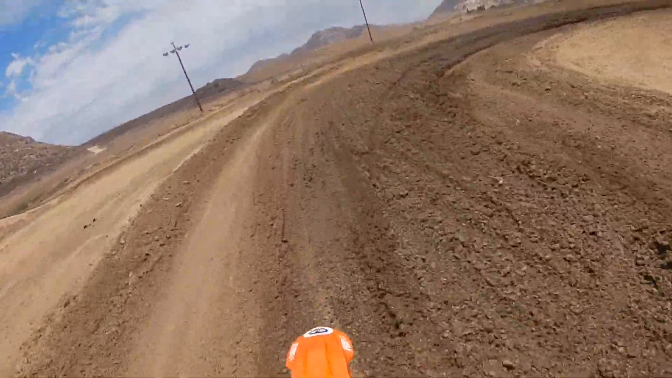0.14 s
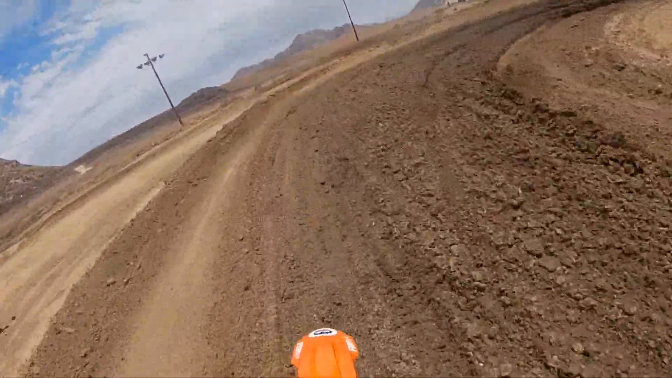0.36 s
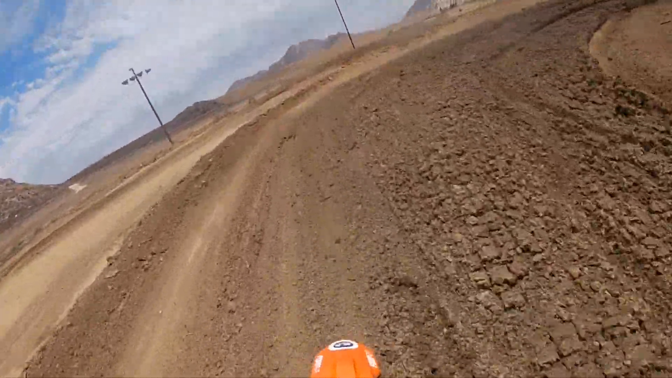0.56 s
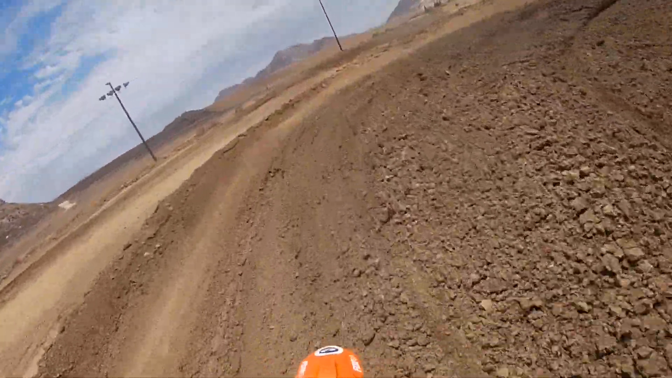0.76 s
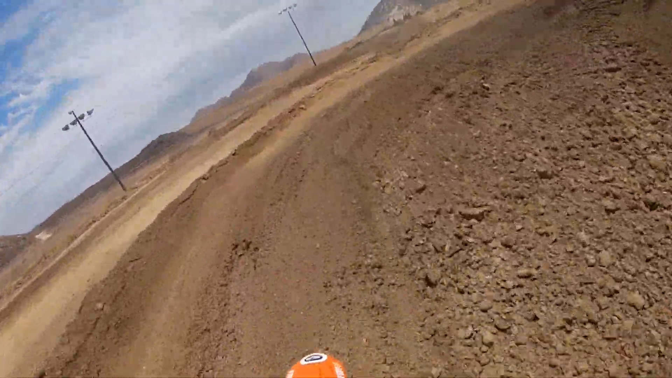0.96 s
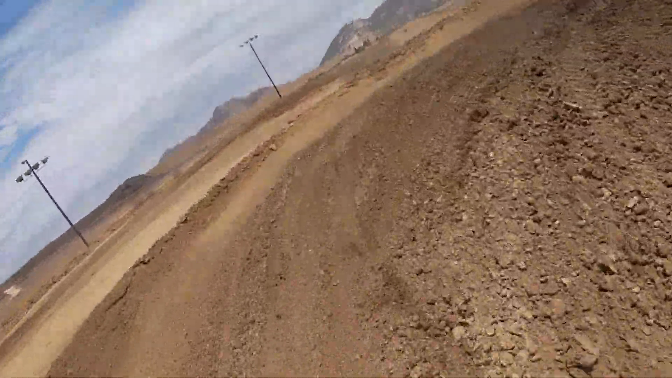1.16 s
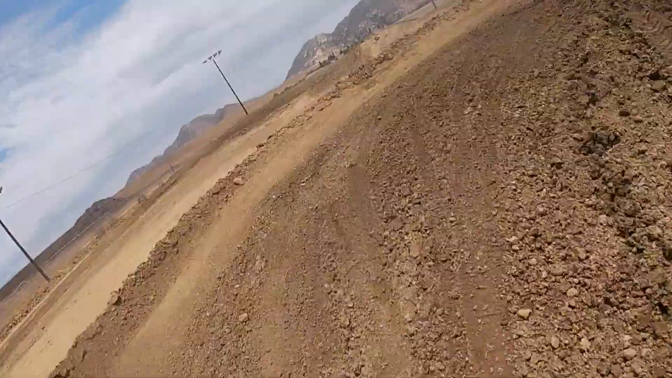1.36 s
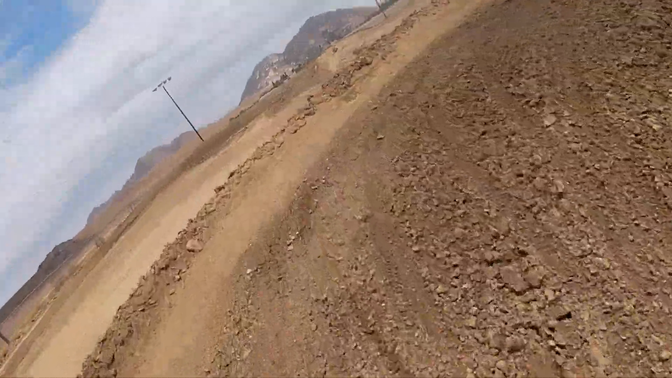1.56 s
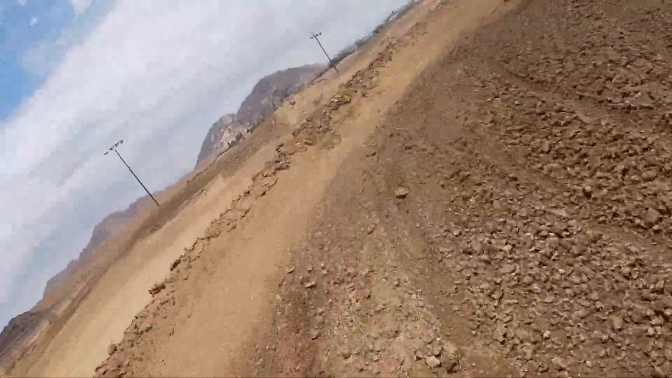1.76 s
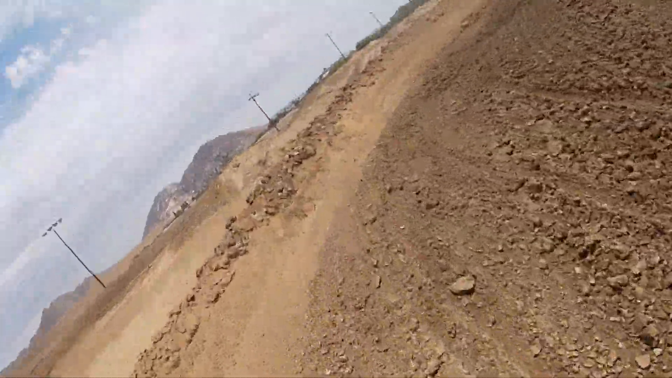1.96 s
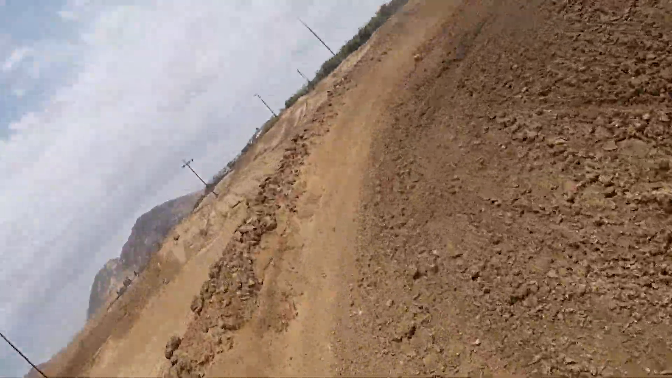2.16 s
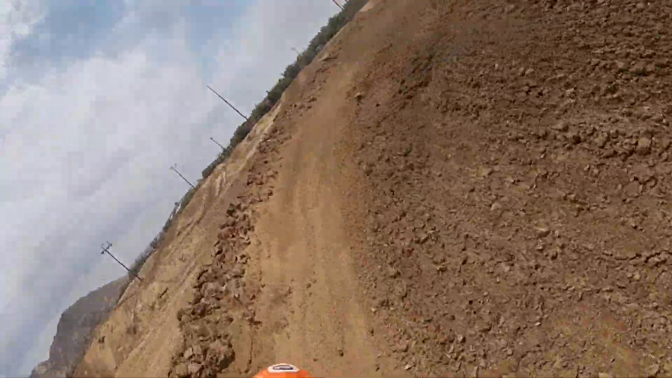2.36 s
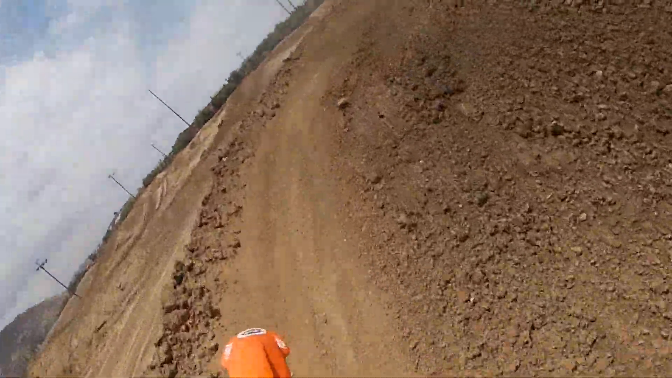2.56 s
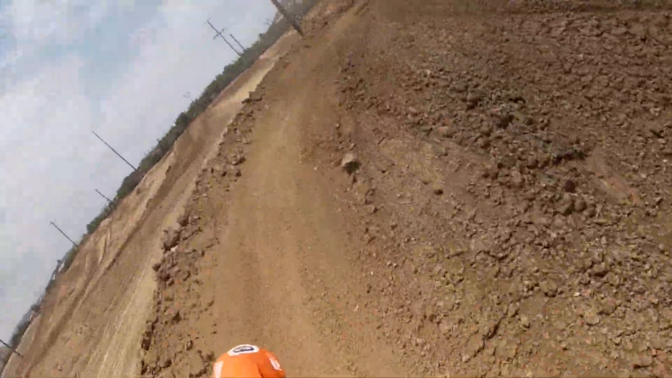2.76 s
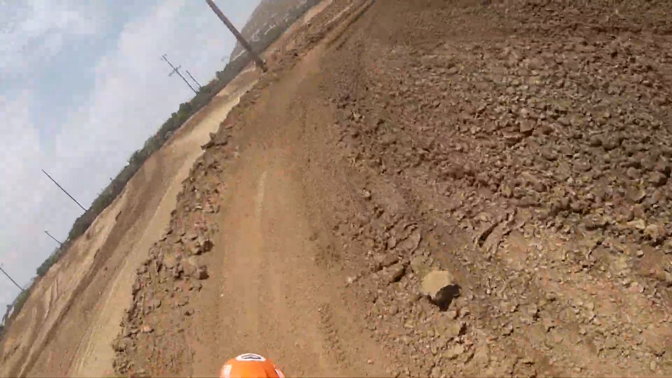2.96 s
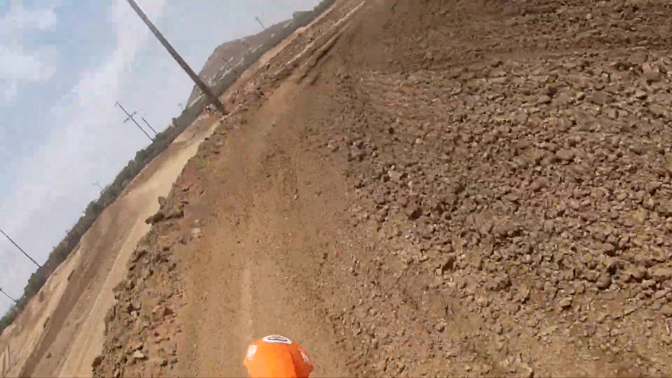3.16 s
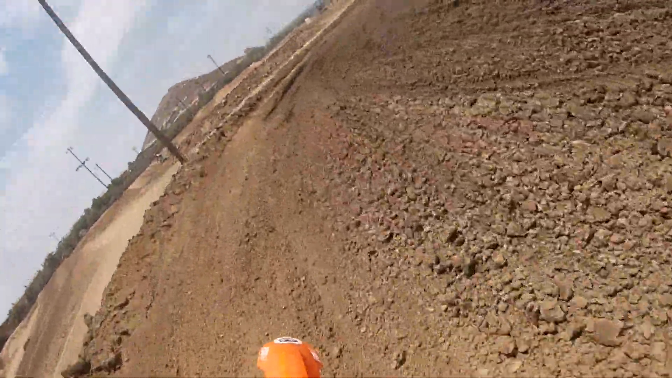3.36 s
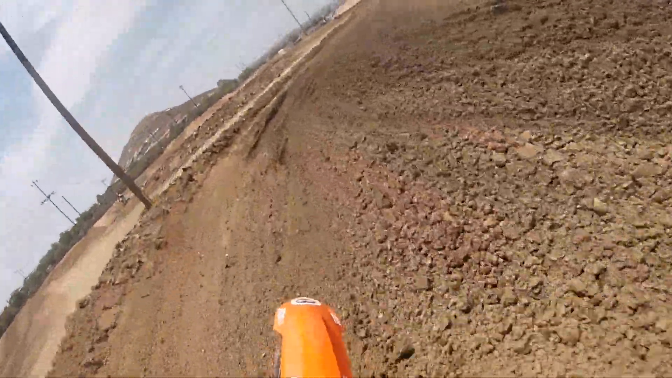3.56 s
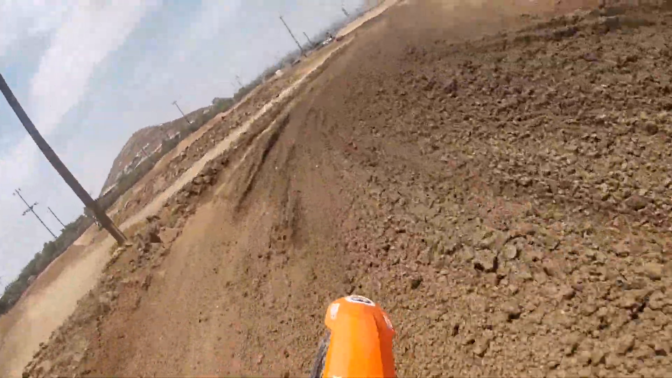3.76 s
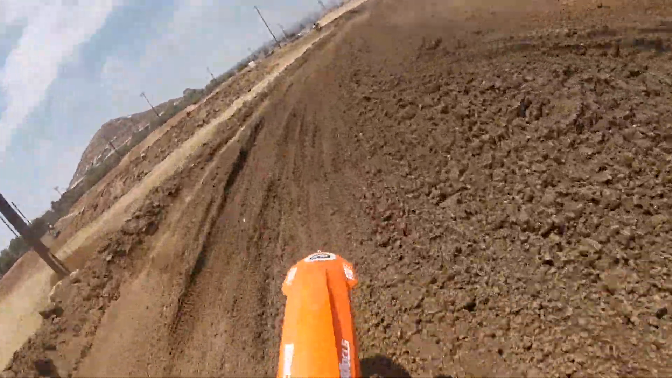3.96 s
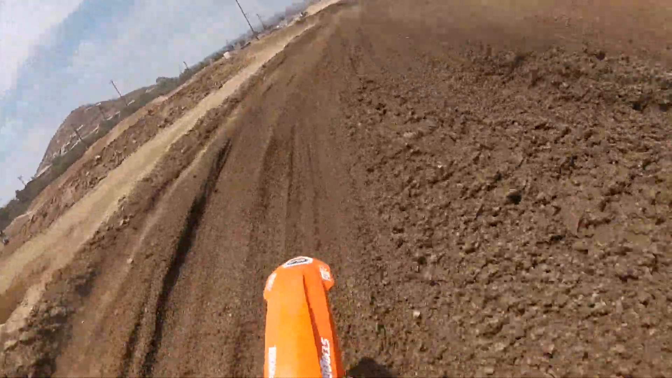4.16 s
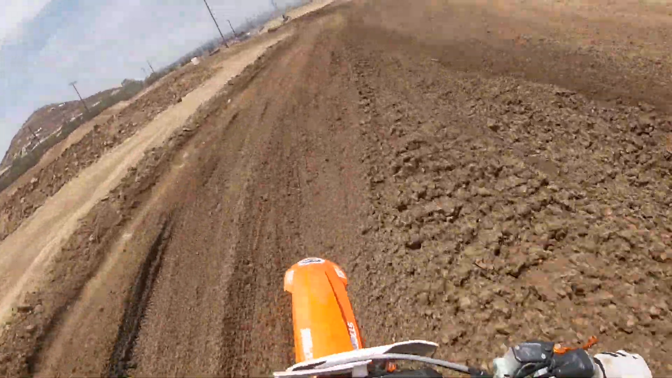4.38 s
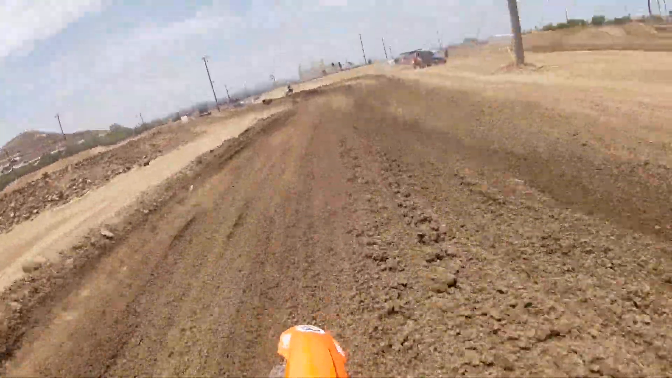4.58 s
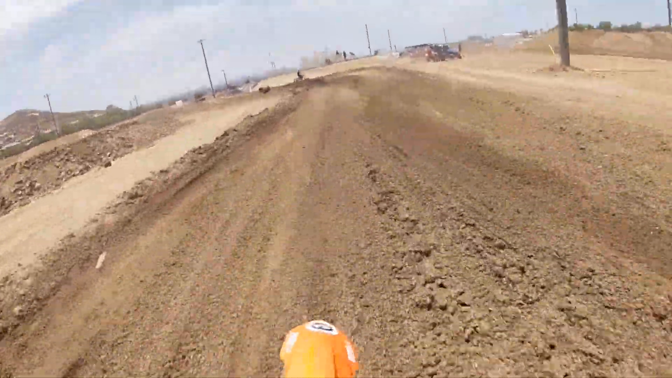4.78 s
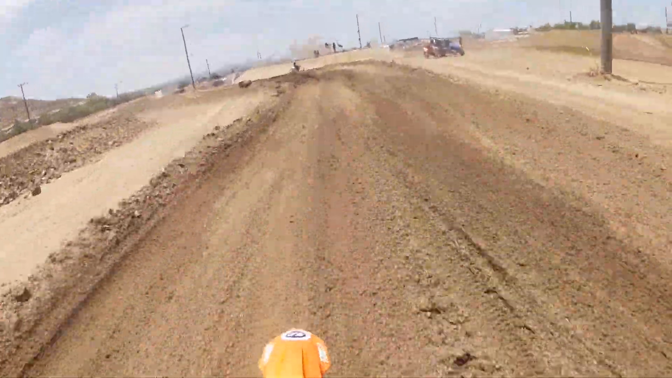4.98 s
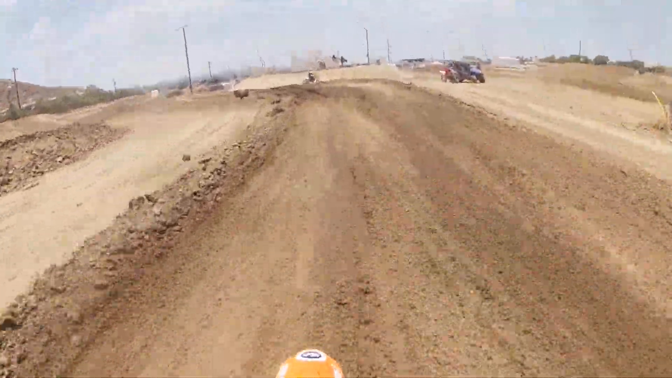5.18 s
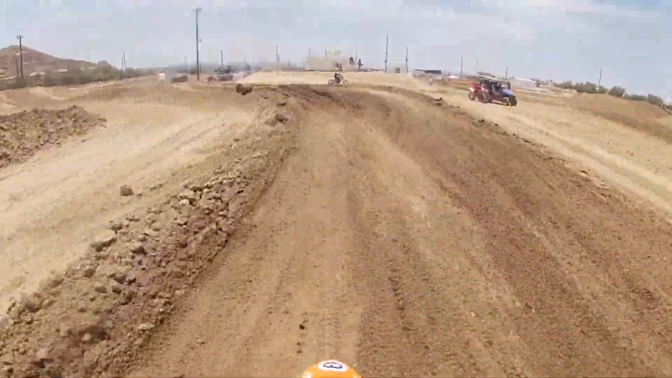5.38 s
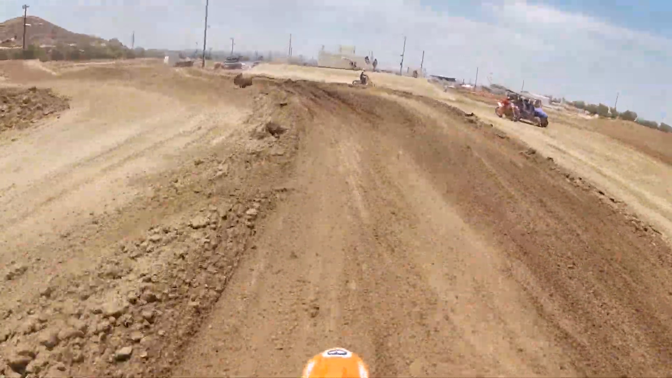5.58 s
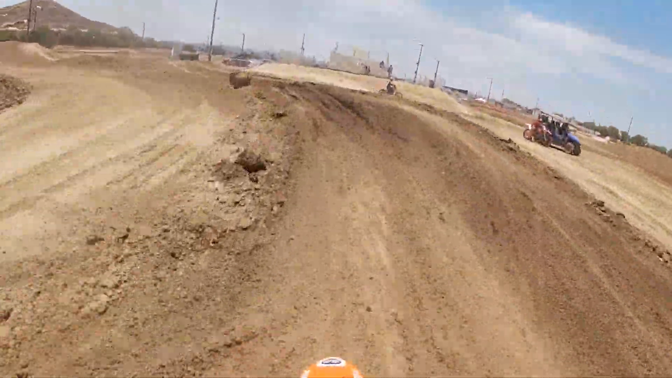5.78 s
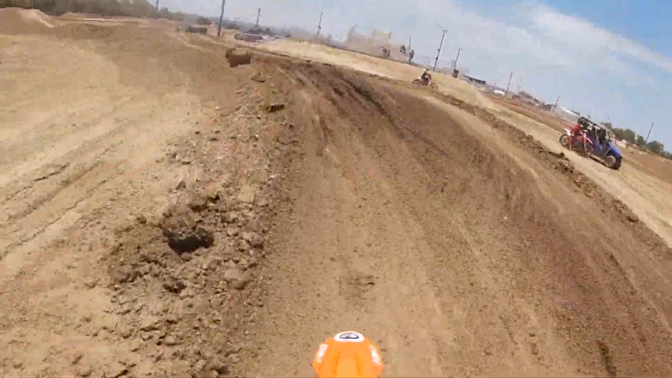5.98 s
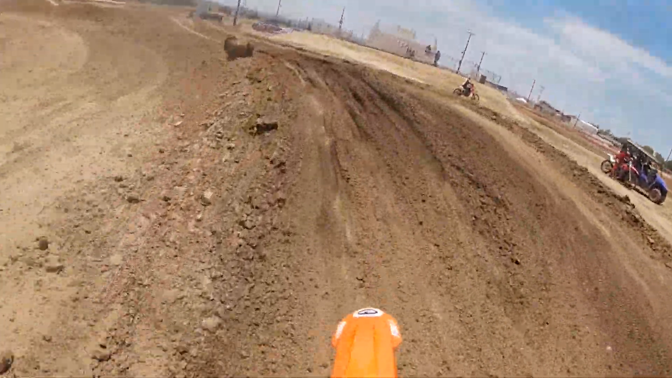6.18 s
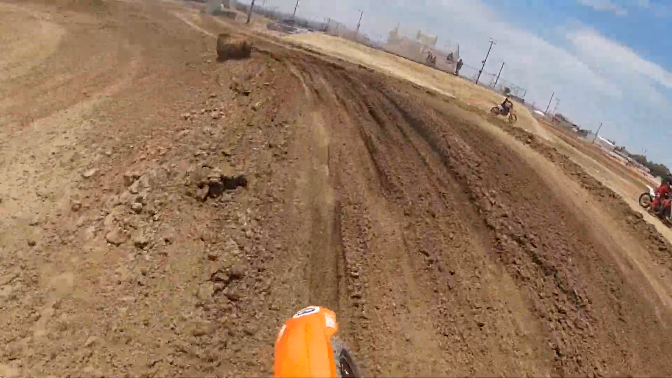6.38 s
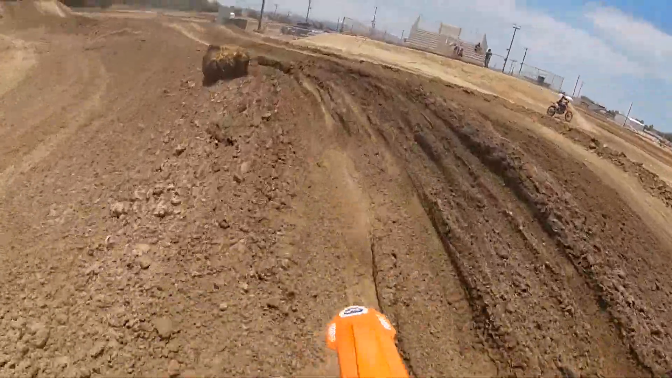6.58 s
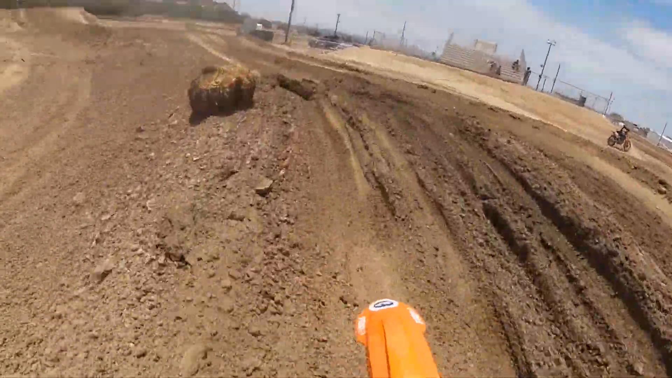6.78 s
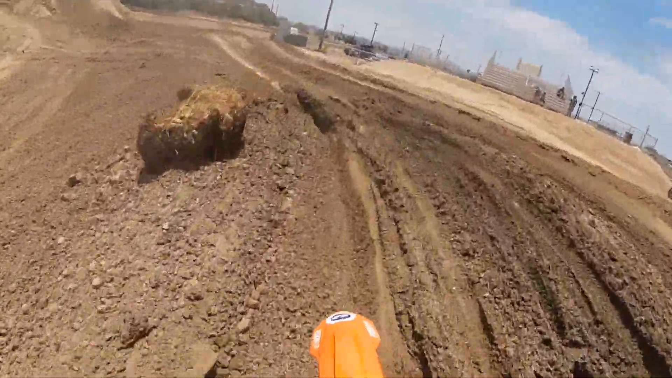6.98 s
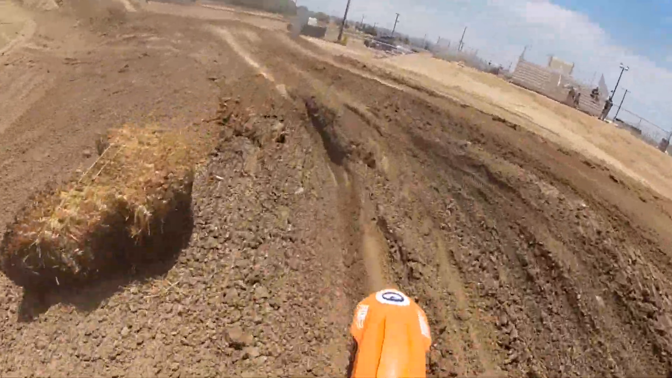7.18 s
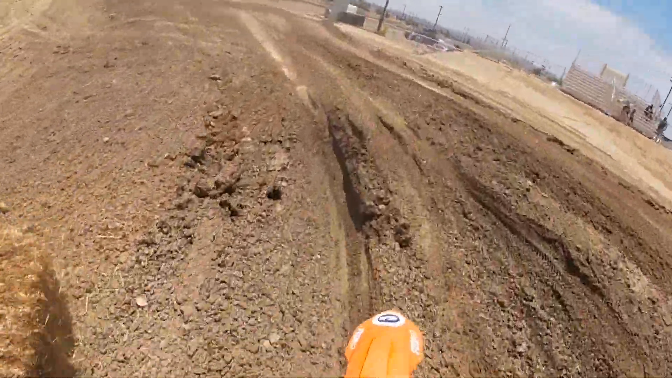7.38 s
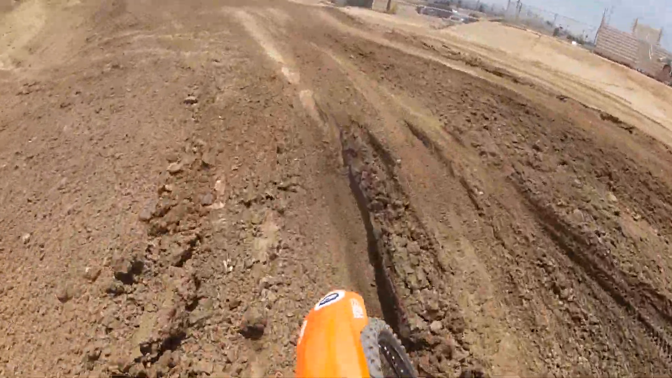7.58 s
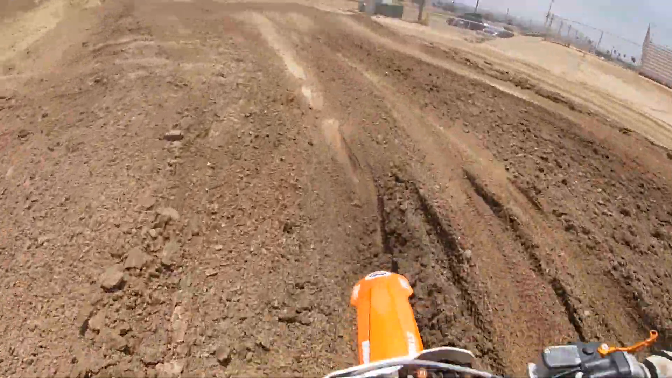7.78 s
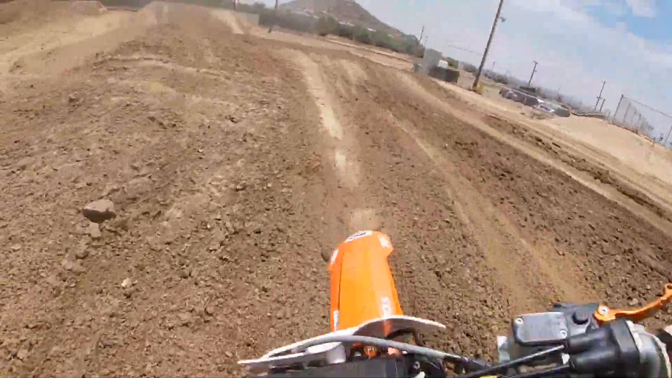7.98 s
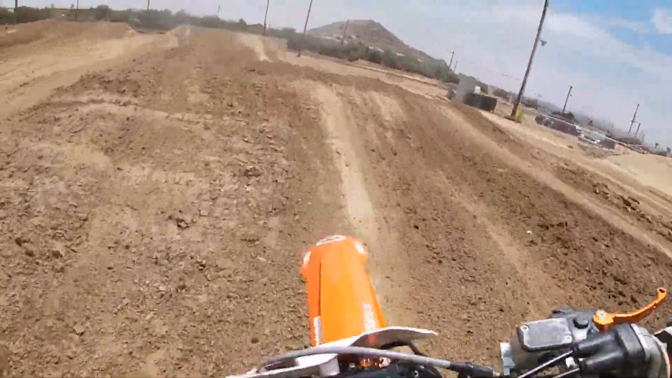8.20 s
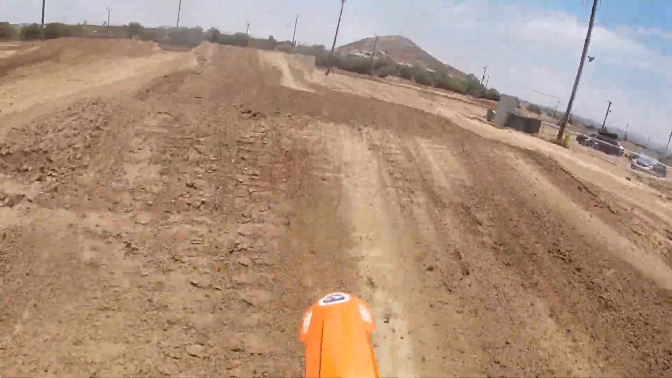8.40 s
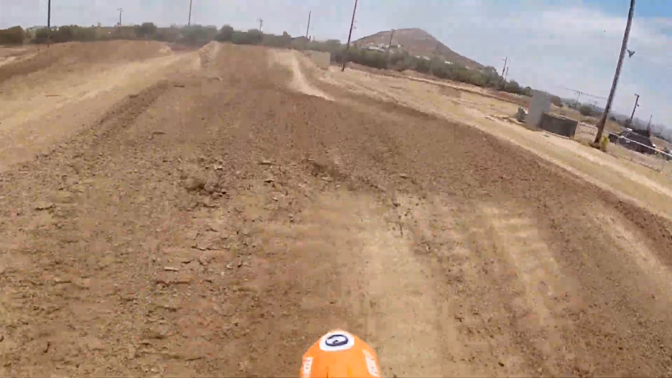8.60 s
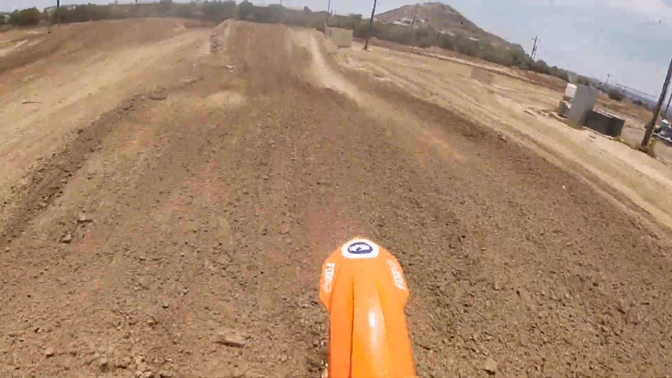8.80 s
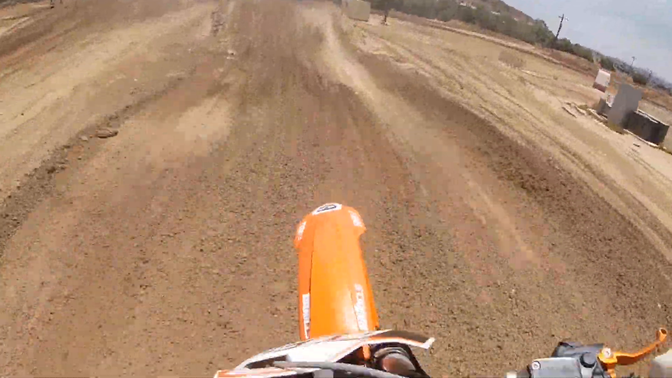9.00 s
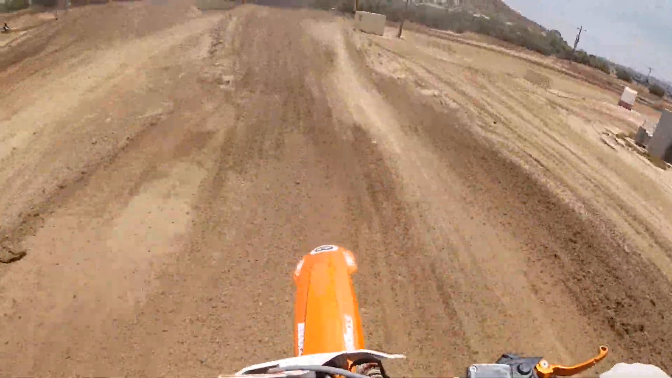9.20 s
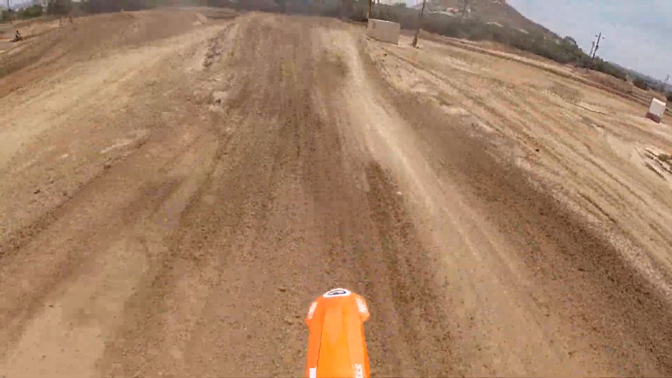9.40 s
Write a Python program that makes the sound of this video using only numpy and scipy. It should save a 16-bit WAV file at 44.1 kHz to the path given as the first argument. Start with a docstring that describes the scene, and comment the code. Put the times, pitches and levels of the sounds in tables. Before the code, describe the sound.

A muffled single-cylinder four-stroke dirt bike is heard close up from the seat, with light engine hiss and low wind buffeting throughout. For the first two seconds it putters unevenly, sinking to its lowest revs around 1 second, with light metallic chain clacks, one dull thud and a faint whine sliding down. At about 2 seconds the throttle opens and the engine grows louder, honking and raspy, climbing in wavering steps to a high note held from 4.4 to 4.9 seconds. It eases off, then drops at 5.6 seconds to a rough low chug, with more faint chain clacks and a short knock near 6.2 seconds. A small swell follows around 6.6 seconds. At 7.6 seconds it revs sharply, dips briefly at 8, reaches its highest pitch near 8.6 and winds down until about 9.5 seconds.

```python
"""A muffled single-cylinder four-stroke dirt bike revving up and down, heard from the seat.
Each firing thumps down the exhaust, cracks at the tailpipe and makes the airbox honk;
on a shut throttle the burning turns uneven. Gas roars, the engine cases hiss, the chain slaps
and the frame thuds twice. A brief whine slides down, and wind buffets the microphone."""
import sys
import numpy as np
from scipy import signal
from scipy.io import wavfile
from scipy.ndimage import uniform_filter1d

SR = 44100
rng = np.random.default_rng(int(sys.argv[2]) if len(sys.argv) > 2 else 0)


def unload_wav(signal):
    """Save mono or channel-first audio to the path in sys.argv[1] as 16-bit WAV at rate SR, clipped to [-1, 1]."""
    wavfile.write(
        sys.argv[1],
        SR,
        np.round(np.clip(np.atleast_2d(signal).T, -1, 1) * 32767).astype(np.int16),
    )


N = 416744

# crank speed: time_s, firing_hz
FIRING_RATE = [(0.0, 48.2), (0.055, 48.18), (0.15, 44.37), (0.215, 44.14), (0.239, 42.81), (0.289, 42.62),
               (0.334, 44.05), (0.454, 44), (0.494, 38.56), (0.559, 37.98), (0.584, 36.63), (0.703, 36.02),
               (0.753, 34.13), (0.778, 31.41), (0.828, 30.77), (0.863, 28.39), (0.888, 24.25),
               (0.898, 23.43), (0.943, 22.98), (0.968, 22.02), (1.033, 22.55), (1.068, 24.95),
               (1.117, 25.27), (1.147, 23.69), (1.192, 24.25), (1.247, 28.76), (1.272, 28.87),
               (1.297, 30.98), (1.327, 32.2), (1.422, 32.23), (1.457, 29.52), (1.517, 30.39),
               (1.586, 29.52), (1.616, 31.34), (1.686, 31.54), (1.711, 32.56), (1.736, 34.95),
               (1.941, 35.48), (1.971, 33.67), (2.08, 34.57), (2.105, 37.79), (2.135, 40.31),
               (2.215, 39.33), (2.245, 44.57), (2.29, 47.26), (2.41, 47.69), (2.444, 43.3), (2.499, 40.53),
               (2.524, 38.08), (2.549, 38.22), (2.584, 41.59), (2.654, 41.68), (2.729, 46.22),
               (2.764, 44.48), (2.854, 43.89), (2.878, 45.65), (2.928, 45.23), (2.998, 49.82),
               (3.078, 51.5), (3.118, 51.57), (3.173, 48.6), (3.273, 50.06), (3.387, 54.29), (3.447, 58.83),
               (3.512, 57.37), (3.567, 61.56), (3.642, 61.57), (3.702, 66.26), (3.816, 67.29),
               (3.846, 65.17), (3.961, 65.27), (4.006, 62.37), (4.061, 68.96), (4.081, 68.47),
               (4.106, 63.48), (4.126, 62.47), (4.195, 69.75), (4.24, 71.27), (4.27, 65.41), (4.295, 63.63),
               (4.325, 65.9), (4.375, 74.2), (4.4, 75.37), (4.939, 73.48), (5.009, 63.04), (5.068, 58.75),
               (5.093, 59.64), (5.128, 63.74), (5.168, 58.67), (5.203, 61.95), (5.243, 61.6),
               (5.283, 63.61), (5.582, 63.34), (5.597, 60.42), (5.622, 51.9), (5.637, 49.67), (5.722, 48.7),
               (5.737, 46.35), (5.787, 36.34), (5.822, 32.97), (5.852, 34.42), (5.882, 34.19),
               (5.941, 35.68), (6.071, 34.85), (6.096, 34.8), (6.131, 37.63), (6.196, 37.57),
               (6.221, 38.99), (6.271, 38.12), (6.301, 40.75), (6.361, 40.36), (6.405, 38.15),
               (6.425, 38.76), (6.455, 40.55), (6.48, 39.92), (6.525, 39.83), (6.565, 41.11),
               (6.605, 41.09), (6.645, 44.84), (6.68, 45.73), (6.75, 44.63), (6.8, 41.27), (6.854, 40.33),
               (6.974, 40.03), (6.999, 37.7), (7.044, 36.18), (7.119, 35.92), (7.169, 38.77), (7.224, 38.5),
               (7.249, 37.72), (7.273, 35.37), (7.328, 34.67), (7.353, 31.96), (7.488, 32.4),
               (7.593, 33.92), (7.613, 37.14), (7.648, 43.95), (7.722, 43.15), (7.782, 48.26),
               (7.832, 45.94), (7.877, 53.72), (7.922, 67.17), (7.937, 68.73), (7.952, 68), (7.962, 67.93),
               (7.992, 52.94), (8.007, 50.03), (8.181, 52.04), (8.251, 60.58), (8.306, 62.94),
               (8.331, 61.4), (8.356, 55.63), (8.366, 56.3), (8.381, 58.3), (8.446, 74.64), (8.461, 77.06),
               (8.511, 75.66), (8.556, 88.04), (8.576, 90.25), (8.68, 84.7), (8.72, 77.8), (8.755, 68.8),
               (8.795, 67.04), (8.99, 65.26), (9.029, 58.1), (9.089, 60.15), (9.149, 54.8), (9.219, 52.63),
               (9.319, 46.1), (9.449, 45.95)]
# rear tyre biting over bumps: time_s, speed_change_pct
TYRE_BUMPS = [(2.345, -4), (4.519, -2), (4.672, -3.5), (4.79, -2), (8.628, -4.5)]
def crank(rough):
    """Firing rate and engine cycle count; bumps dent the speed, rough burning jitters the timing."""
    t = np.arange(N) / SR
    sag_s, recover_s, start_cycles = .0485, .075, .36
    dents = sum(pct / 100 * np.interp(t, [s - sag_s, s, s + recover_s], [0, 1, 0])
                for s, pct in TYRE_BUMPS)
    firing_hz = curves(FIRING_RATE)[0] * (1 + dents)
    cycles = start_cycles + np.cumsum(firing_hz) / SR
    return firing_hz, cycles + .002 * firing_hz * rough ** 1.5 * per_cycle(cycles)


# exhaust boom ahead of the silencer: time_s, level_db
BOOM = [(0, -18), (.25, -14.5), (.5, -15), (.7, -15), (.9, -18), (1.05, -13.5), (1.13, -16), (1.3, -14.5),
        (1.5, -15), (1.75, -11.5), (2.05, -11), (2.32, -10.5), (2.5, -12.5), (2.9, -16), (3.18, -16.5),
        (3.45, -13), (3.7, -8.5), (4.05, -11.5), (4.14, -20.5), (4.24, -17.5), (4.45, -20), (4.8, -17.5),
        (4.93, -15), (5.0, -32), (5.7, -20), (5.85, -24), (6.0, -19.5), (6.3, -13), (6.5, -11.5),
        (6.6, -13), (6.85, -10.5), (7.05, -13.5), (7.3, -13.5), (7.55, -14.5), (7.65, -13), (7.94, -8.5),
        (8.0, -9), (8.1, -9.5), (8.3, -12), (8.4, -12.5), (8.6, -18.5), (8.95, -17), (9.1, -30.5),
        (9.45, -21)]
# silencer response: freq_hz, shut_gain_db, loaded_gain_db
SILENCER_RESPONSE = [(20, -27, -24), (36, -11.5, -10), (48.7, -3.5, -5.5), (62.5, -2.5, -4),
                     (98, -3.5, 0.5), (122, -3.5, -3), (172, -5, -8.5), (212, -3.5, -14.5),
                     (300, -25, -32.5)]
def exhaust(cycles, firing_hz, rough, load):
    """The silencer passes the four lowest orders of the blow-down pulses."""
    hz, shut_db, loaded_db = np.transpose(SILENCER_RESPONSE)
    boom_db = curves(BOOM)[0]
    out = np.zeros(N)
    for k, lag_cycles in enumerate((.65, .6, .53, .52), start=1):
        log_hz = np.log(k * firing_hz)
        db = boom_db + (2 - load) * np.interp(log_hz, np.log(hz), shut_db)
        db += load * np.interp(log_hz, np.log(hz), loaded_db)
        if k == 1:
            db -= 2.5 * load
        out += gain_of(db) * engine_order(cycles, k, lag_cycles, .42 * rough)
    return np.sqrt(2) * out


# airbox resonance: time_s, level_db, pitch_hz
HONK = [(0, -24.5, 220), (.15, -22, 224), (.6, -31.5, 230), (1.2, -32.5, 278), (1.45, -27, 317),
        (1.72, -19.5, 314), (1.95, -35, 275), (2.05, -28, 276), (2.12, -18.5, 310), (2.26, -15, 309),
        (2.7, -11.5, 307), (3.06, -11.5, 320), (3.15, -18, 323), (3.29, -13, 346), (3.55, -14, 357),
        (3.72, -13.5, 336), (3.88, -14.5, 358), (4.0, -12, 320), (4.12, -11, 323), (4.23, -10.5, 300),
        (4.31, -11, 316), (4.39, -10, 275), (4.6, -10.5, 294), (4.76, -11, 290), (4.91, -13, 287),
        (4.96, -17.5, 287), (5.1, -18, 257), (5.3, -16, 285), (5.58, -14, 300), (5.62, -18, 256),
        (5.7, -19, 250), (5.73, -26.5, 245), (5.87, -32, 248), (6.15, -35, 270), (6.5, -28.5, 252),
        (6.54, -21.5, 270), (6.62, -17.5, 290), (6.71, -23, 315), (6.76, -29, 270), (6.9, -32, 261),
        (7.6, -26.5, 295), (7.616, -22, 300), (7.645, -9, 340), (7.75, -10, 320), (7.88, -10.5, 271),
        (8.0, -14, 323), (8.2, -10.5, 320), (8.32, -11.5, 326), (8.41, -8.5, 300), (8.47, -10.5, 315),
        (8.6, -13, 317), (8.69, -13, 301), (8.74, -16.5, 300), (8.8, -19, 282), (8.9, -18, 306),
        (9.15, -19.5, 242), (9.4, -28, 230), (9.45, -25.5, 252)]
# airbox ring, orders above split_hz cresting earlier: time_s, cutoff_hz, split_hz
HONK_SHAPE = [(0, 402, 336), (2.05, 402, 312), (2.3, 373, 322), (2.55, 397, 283), (2.9, 383, 272),
              (3.1, 357, 300), (3.4, 376, 300), (3.6, 407, 300), (3.8, 426, 334), (4.05, 430, 323),
              (4.28, 420, 300), (4.4, 335, 265), (4.65, 355, 256), (4.95, 357, 261), (5.2, 357, 266),
              (5.6, 324, 280), (5.8, 406, 287), (7.55, 417, 297), (7.65, 376, 285), (7.85, 415, 300),
              (8.0, 350, 360), (8.2, 342, 370), (8.3, 390, 346), (8.45, 350, 300), (8.8, 383, 300),
              (9.45, 400, 300)]
# engine sound above the honk, relative levels: time_s, growl_db, rasp_db, hiss_db
UPPER_LEVELS = [(0, -41, -36.5, -41), (.1, -31, -35.5, -40), (.3, -47, -36, -41.5), (.55, -41, -36, -38.5),
                (.9, -39, -39, -42.5), (1.15, -36, -41, -43.5), (1.4, -43, -36, -39.5),
                (1.6, -44, -37, -40.5), (1.86, -22, -38, -38), (2.04, -21, -37.5, -41.5),
                (2.12, -20, -30, -40.5), (2.29, -13, -20.5, -40), (2.47, -20.5, -30, -43),
                (2.58, -23, -25.5, -40.5), (2.72, -27, -24.5, -43.5), (2.8, -31, -28, -45),
                (3.05, -27.5, -26, -45.5), (3.18, -20, -28.5, -45), (3.3, -22, -22.5, -44),
                (3.7, -30, -18, -37.5), (3.95, -19, -24.5, -39.5), (4.08, -29, -22.5, -39.5),
                (4.18, -42, -25, -41), (4.34, -44, -21, -39.5), (4.5, -39, -27, -41),
                (4.76, -16, -28.5, -41), (4.92, -19.5, -28.5, -45), (4.98, -26, -46, -47),
                (5.2, -26, -44, -46), (5.55, -31.5, -42.5, -43.5), (5.85, -32, -47, -50.5),
                (6.2, -32.5, -44, -44.5), (6.5, -46.5, -44, -43), (6.68, -42, -36.5, -41),
                (6.85, -44, -40.5, -44.5), (7.2, -32, -44.5, -48.5), (7.59, -42.5, -49.5, -48),
                (7.64, -35, -32, -41), (7.78, -56, -39.5, -49), (7.95, -19, -30.5, -42),
                (8.05, -19, -34, -47), (8.36, -26.5, -39, -47), (8.45, -60, -29.5, -43),
                (8.65, -18, -27, -42.5), (8.79, -16, -26.5, -46), (9.05, -23.5, -31.5, -40),
                (9.37, -57, -42, -42), (9.45, -40, -38, -42.5)]
def airbox_resonance(firing_hz, load):
    """Amplitudes of orders 1-14 in the airbox honk and the growl above it."""
    hop = 64
    honk_db, honk_hz = (curve[::hop] for curve in curves(HONK))
    cutoff_hz = curves(HONK_SHAPE)[0][::hop]
    growl_db = curves(UPPER_LEVELS)[0][::hop]
    hz = np.arange(1, 15)[:, None] * firing_hz[::hop]
    honk = 1 / (1 + ((hz - honk_hz) / 130) ** 2) ** 2
    honk /= (1 + (hz / cutoff_hz) ** 18) * (1 + (.52 * honk_hz / hz) ** 8)  # steep skirts
    honk += .5 * (1 - load[::hop]) / (1 + (hz / 170) ** 6)  # boomy putt off load
    growl = 1 / (1 + ((hz - 450) / 105) ** 2) ** 1.1
    sizes = (gain_of(honk_db + .5) * honk / np.linalg.norm(honk, axis=0)
             + gain_of(growl_db - 9) * growl / np.linalg.norm(growl, axis=0))
    return [np.interp(np.arange(N), np.arange(0, N, hop), row) for row in sizes]


# third-order drone at high revs and under engine braking: time_s, level_db
THIRD_ORDER_DRONE = [(3.9, -44), (4.05, -16), (4.14, -17.5), (4.24, -15), (4.3, -15), (4.4, -15.5),
                     (4.8, -22), (4.95, -26.5), (5.05, -17.5), (5.2, -22), (5.6, -40), (5.7, -53.5),
                     (8.38, -51), (8.46, -15), (8.6, -9), (8.7, -26), (8.78, -51), (8.98, -41),
                     (9.05, -17.5), (9.14, -13), (9.4, -17.5), (9.45, -42)]
def airbox(cycles, firing_hz, rough, load):
    """Each gulp rings long in the airbox on an open throttle; on a shut one it is a short putt."""
    putt_cycles, crest_cycles = .52, .08
    sizes = airbox_resonance(firing_hz, load)
    split_order = curves(HONK_SHAPE)[1] / firing_hz
    width_orders = .2 * (firing_hz / 45) ** 3
    ring_share = np.clip(8 * (.32 - rough), 0, 1)
    scatter = .34 * np.tanh(3 * rough)
    out = np.zeros(N)
    for k in range(2, 15):
        level = sizes[k - 1] * (load if k < 5 else 1)
        if k == 3:
            level = np.hypot(level, gain_of(curves(THIRD_ORDER_DRONE)[0]))
        phase_lead = .15 + 1.4 * np.arctan((k - split_order) / width_orders) / (2 * np.pi)
        putt = engine_order(cycles, k, putt_cycles - .34 / k, scatter)
        ring = engine_order(cycles, k, crest_cycles - phase_lead / k, scatter)
        out += level * (np.sqrt(1 - ring_share) * putt + np.sqrt(ring_share) * ring)
    return np.sqrt(2) * out


# ground reflection: time_s, delay_ms
GROUND_BOUNCE = [(0, 2.2), (2.2, 2), (2.6, 3.82), (3.55, 3.72), (3.9, 3.23), (4.9, 4.4), (7.6, 4),
                 (8.4, 3.3), (9.45, 3.1)]
def firing_clicks(cycles, rough):
    """One click per firing, plus its bounce off the ground."""
    at = np.flatnonzero(np.diff(np.floor(cycles)) > 0)
    size = gain_of(2.5 * rough * per_cycle(cycles))[at]
    delay = (curves(GROUND_BOUNCE)[0][at] * SR / 1000).astype(int)
    out = np.zeros(N)
    out[at] = size
    out[np.minimum(at + delay, N - 1)] = .75 * size
    return out


# tailpipe crack: freq_hz, gain_db
CRACK_SPECTRUM = [(300, -45), (600, -18), (720, -1), (860, -1), (1000, -0.5), (1200, -4), (1500, -0.5),
                  (1900, -17.5), (2400, -31.5), (3500, -44.5), (6000, -33.5), (9000, -79)]
# tailpipe rings, relative to the crack: time_s, high_hz, high_db, low_hz, low_db
PIPE_RINGS = [(2.05, 1098, -22, 798, -6.5), (2.4, 1210, -18, 908, -15), (2.6, 1070, -21, 880, -32.5),
              (3, 1130, -4.5, 849, -8), (3.45, 1098, -0.5, 878, -8), (3.7, 1073, -27, 764, -20),
              (3.87, 1316, -4, 759, -17), (3.93, 1300, 9.5, 890, 10), (4.1, 1100, -9, 848, -5),
              (4.33, 1075, -7, 898, 0.5), (4.5, 1213, 8, 930, -1.5), (4.95, 1312, -10, 846, -1),
              (7.6, 1176, -3, 837, -7.5), (8, 1072, -10, 850, -8.5), (8.4, 1252, -9.5, 866, -10.5),
              (8.9, 1173, -13, 810, -6)]
# bite as the engine pulls, relative to the crack: time_s, level_db
PIPE_BITE = [(2.05, -9), (2.3, -7), (2.55, -4), (3.2, -22), (3.45, 0.5), (3.7, -6.5), (3.9, -1.5),
             (4.1, -14), (4.35, -16.5), (4.6, 5), (4.95, -7), (7.6, -9.5), (7.95, -7), (8.2, -11.5),
             (8.5, -9.5), (8.9, -12.5)]
def tailpipe_crack(cycles, rough, pull):
    """Under load each firing sends a click and a noisy puff that ring the tailpipe."""
    puff_s = .003
    clicks = firing_clicks(cycles, rough)
    puff = signal.lfilter([1], [1, -np.exp(-1 / (puff_s * SR))], clicks)
    blast = clicks + .007 * puff * rng.standard_normal(N)
    high_hz, high_db, low_hz, low_db = curves(PIPE_RINGS)
    ring = gain_of(high_db) * resonate(blast, high_hz, width_hz=170)
    ring += gain_of(low_db) * resonate(blast, low_hz, width_hz=62)
    ring += gain_of(curves(PIPE_BITE)[0]) * resonate(blast, hz=1574, width_hz=366)
    crack = hold_level(unit_rms(colour(blast, CRACK_SPECTRUM)) + ring)
    rasp_db = curves(UPPER_LEVELS)[1]
    return gain_of(rasp_db - 3) * pull * crack


# gas roar: freq_hz, gain_db
ROAR_SPECTRUM = [(220, -38.5), (380, 0), (420, -11), (513, -14.5), (670, -16.5), (881, -18), (1230, -17),
                 (1520, -18.5), (2120, -29), (2400, -31.5), (3120, -53.5), (5280, -120)]
# drop of the roar at full pull: time_s, cut_db
ROAR_CUT = [(2.1, 12), (3.1, 14), (3.3, 21), (3.8, 21), (3.95, 15), (4.9, 14), (7.6, 9), (8, 8), (8.35, 9),
            (8.5, 17), (9, 17)]
def gas_roar(cycles, throttle, pull):
    """Gas rushes after each firing; the roar gives way to the crack under load."""
    rasp_db = curves(UPPER_LEVELS)[1]
    level_db = rasp_db + 5.5 - curves(ROAR_CUT)[0] * pull
    throb = 1 + (.8 + .7 * throttle) * pulse(cycles, lag_cycles=.54 - .41 * throttle, sharpness=3)
    return gain_of(level_db) * throb * flicker_noise(ROAR_SPECTRUM, flicker_db=.76)


# engine case hiss: freq_hz, gain_db
HISS_SPECTRUM = [(1180, -13), (2000, -4.5), (2330, -11.5), (2520, -2.5), (2730, -4), (2950, -2), (3360, 0),
                 (4480, -13), (5260, -11), (6670, -30.5), (8670, -63.5), (14700, -120)]
# top-end fizz: freq_hz, gain_db
FIZZ_SPECTRUM = [(5500, -34), (7000, -3), (8500, -13), (10300, -14.5), (12000, -13), (12700, -11.5),
                 (13500, -29), (14500, -59.5)]
def case_hiss(cycles, throttle):
    """The cases hiss in time with the firing; fizz follows more steeply and rises with throttle."""
    hiss_db = curves(UPPER_LEVELS)[2]
    fizz_db = -87 + 1.8 * (hiss_db + 44.5) + 12.5 * throttle
    throb = 1 + (.28 + .22 * throttle) * pulse(cycles, lag_cycles=.15, sharpness=2.3)
    hiss = gain_of(hiss_db - 2.5) * flicker_noise(HISS_SPECTRUM, flicker_db=1.4)
    fizz = gain_of(fizz_db) * flicker_noise(FIZZ_SPECTRUM, flicker_db=2.9)
    return throb * hiss + throb ** 2 * fizz


# chain slaps: start_s, relative_db
CHAIN_HITS = [(0.2179, -56), (0.3706, -45.5), (0.5965, -54), (0.8641, -48), (0.942, -43), (0.982, -40.5),
              (1.026, -41.5), (1.0715, -51), (1.146, -46), (1.1794, -55), (1.3678, -49), (1.422, -43),
              (1.4735, -51), (1.4995, -45), (1.5314, -57), (1.6292, -46), (1.8956, -51), (5.5923, -59),
              (5.6932, -54), (5.779, -44), (5.806, -54), (5.9853, -50), (6.0754, -49), (6.1035, -50),
              (6.1318, -46.5), (6.1626, -48)]
# ring of the struck parts: freq_hz, gain_db
CHAIN_SPECTRUM = [(880, -67), (1500, 4), (2000, -14), (2510, -0.5), (2800, -5.5), (3300, 3), (4300, -11),
                  (5250, -9), (6200, -20), (7500, -31), (9000, -37), (12000, -42), (14700, -100)]
def chain_slaps():
    """Metallic clacks: short noise bursts through the ring of the parts."""
    rise_s, fall_s = .00055, .011
    start_s, db = np.transpose(CHAIN_HITS)
    hits = np.zeros(N)
    hits[(start_s * SR).astype(int)] = gain_of(db + 10)
    t = np.arange(4000) / SR
    burst = (1 - np.exp(-t / rise_s)) * np.exp(-t / fall_s)
    envelope = signal.oaconvolve(hits, burst)[:N]
    noise = rng.standard_normal(N)
    return colour(envelope * noise, CHAIN_SPECTRUM) / np.std(colour(noise, CHAIN_SPECTRUM))


# frame thuds: start_s, level_db, pitch_hz, length_s
FRAME_HITS = [(0.947, -10.5, 84.4, 0.084), (6.202, -14, 310, 0.016)]
def frame_thuds():
    """Dull thuds through the frame: a few cycles of a low tone swell and die."""
    t, out = np.arange(N) / SR, np.zeros(N)
    for start_s, db, hz, length_s in FRAME_HITS:
        age_s = t - start_s
        envelope = np.sin(np.pi * np.clip(age_s / length_s, 0, 1))
        out += gain_of(db) * envelope * np.sin(2 * np.pi * hz * age_s)
    return out


# falling whine: time_s, level_db, pitch_hz
WHINE_GLIDE = [(.52, -60, 1580), (.62, -42, 1560), (.75, -43, 1480), (.85, -49, 1430), (.93, -36.5, 1336),
               (1.15, -39.5, 1005), (1.3, -42.5, 849), (1.4, -61, 745)]
def whine():
    """A rough whistle of narrow-band noise slides down."""
    db, hz = curves(WHINE_GLIDE)
    return gain_of(db) * resonate(rng.standard_normal(N), hz, width_hz=120)


# wind rumble: freq_hz, gain_db
WIND_SPECTRUM = [(15, -36), (30, 11), (60, 3.5), (150, 5.5), (300, 3), (450, -13.5), (700, -66)]
# gust strength: time_s, relative_db
WIND_GUSTS = [(0, -37), (.75, -31.5), (.97, -32), (1.15, -37), (1.6, -32), (2.1, -31.5), (2.85, -27),
              (3.8, -33.5), (4.3, -39.5), (5.0, -29), (5.16, -29.5), (5.6, -32.5), (6.7, -29), (7.6, -46),
              (8.4, -28.5), (8.6, -33.5), (9.45, -33)]
def wind():
    """Air buffets the microphone in low lumps."""
    lump_db, lump_s = 2.5, .07
    level_db = curves(WIND_GUSTS)[0] + 7.5 + lump_db * np.tanh(slow_noise(round(lump_s * SR)))
    return gain_of(level_db) * flicker_noise(WIND_SPECTRUM, flicker_db=1)


def per_cycle(cycles):
    """One random value per engine cycle, interpolated."""
    return np.interp(cycles, np.arange(700), rng.standard_normal(700))


def engine_order(cycles, k, lag_cycles, scatter):
    """Harmonic k of the firing rate; uneven burning shakes its size and phase."""
    size = 1 + scatter * per_cycle(cycles)
    return size * np.cos(2 * np.pi * k * (cycles - lag_cycles) + scatter * per_cycle(cycles))


def pulse(cycles, lag_cycles, sharpness):
    """One smooth unit peak per cycle."""
    return np.exp(sharpness * (np.cos(2 * np.pi * (cycles - lag_cycles)) - 1))


def gain_of(db):
    return 10 ** (np.asarray(db) / 20)


def unit_rms(x):
    return x / np.sqrt(np.mean(x ** 2) + 1e-20)


def smooth(x, samples):
    return uniform_filter1d(uniform_filter1d(x, samples), samples)


def hold_level(x):
    """Holds the running RMS at 1."""
    return x / np.sqrt(abs(smooth(x ** 2, samples=6000)) + 1e-12)


def slow_noise(samples):
    return unit_rms(smooth(rng.standard_normal(N), samples))


def curves(rows):
    """One per-sample curve for each column after time_s."""
    time_s, *columns = np.transpose(rows)
    return [np.interp(np.arange(N) / SR, time_s, column) for column in columns]


def colour(x, spectrum):
    """Minimum-phase filter with the given spectrum."""
    hz, db = np.transpose(spectrum)
    bin_hz = abs(np.fft.fftfreq(8192, 1 / SR))
    bin_db = np.maximum(np.interp(np.log(bin_hz + 1), np.log(hz), db), -100)
    response = np.exp(np.conj(signal.hilbert(np.log(gain_of(bin_db)))))
    return signal.oaconvolve(x, np.fft.ifft(response).real[:4096])[:len(x)]


def resonate(x, hz, width_hz):
    """Gliding resonance at unit RMS: shift hz to zero, low-pass twice, shift back."""
    carrier = np.exp(2j * np.pi * np.cumsum(hz * np.ones(N)) / SR)
    pole = np.exp(-np.pi * width_hz / SR)
    baseband = x / carrier + 1e-18
    for _ in range(2):
        baseband = signal.lfilter([1 - pole], [1, -pole], baseband)
    return unit_rms((carrier * baseband).real)


def flicker_noise(spectrum, flicker_db):
    """Coloured noise whose level flickers."""
    flicker = gain_of(flicker_db * slow_noise(samples=250))
    return flicker * unit_rms(colour(rng.standard_normal(N), spectrum))


# uneven burning, strong on a shut throttle: time_s, roughness_ratio
ROUGHNESS = [(0, .45), (.5, .6), (1.2, .7), (1.5, .45), (2.05, .4), (2.15, .15), (3, .14), (3.3, .08),
             (4.9, .09), (5.1, .15), (5.27, .08), (5.57, .08), (5.62, .17), (5.7, .2), (5.74, .7),
             (6.3, .55), (6.5, .45), (6.54, .2), (6.71, .2), (6.77, .36), (7.1, .4), (7.59, .45),
             (7.612, .15), (8.1, .08), (9, .08), (9.38, .1), (9.45, .5)]
# rider's throttle: time_s, open_ratio
THROTTLE_OPENING = [(0, 0), (.4, 0), (1.5, 0.09), (2.04, 0.52), (2.12, 1), (3.08, 0.98), (3.17, 0.62),
                    (3.3, 0.55), (4.92, 0.69), (4.98, 0.35), (5.6, 0), (5.75, 0), (6.5, 0.37), (6.65, 0.45),
                    (6.85, 0.51), (7.6, 0.23), (7.62, 0.85), (8.97, 0.6), (9.05, 0.53), (9.3, 0.37),
                    (9.45, 0.3)]
def scene():
    """One crank drives all engine layers; chain, frame, whine and wind join them in mono."""
    rough, throttle = curves(ROUGHNESS)[0], curves(THROTTLE_OPENING)[0]
    load = np.clip(1.3 - 2.5 * rough, 0, 1)  # a loaded engine burns evenly
    pull = np.clip(2.5 * (throttle - .35), 0, 1)
    firing_hz, cycles = crank(rough)
    thump_gain = gain_of(4.5 * rough * per_cycle(cycles))
    low = exhaust(cycles, firing_hz, rough, load) + airbox(cycles, firing_hz, rough, load)
    rasp = tailpipe_crack(cycles, rough, pull) + gas_roar(cycles, throttle, pull)
    engine = thump_gain * low + rasp + case_hiss(cycles, throttle)
    return (engine + chain_slaps() + frame_thuds() + whine() + wind())[None]


def record(dry):
    """Soft overload of the tallest peaks, then a low-pass."""
    ceiling, cutoff_hz = .9, 14900
    soft = dry / (1 + abs(dry / ceiling) ** 4) ** .25
    taps = signal.firwin(511, cutoff_hz, window=("kaiser", 9), fs=SR)
    return signal.oaconvolve(soft, taps[None], "same")


dry = scene()
out = record(dry)
unload_wav(out)
```